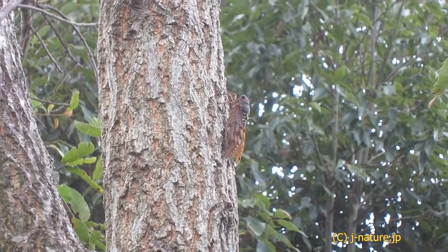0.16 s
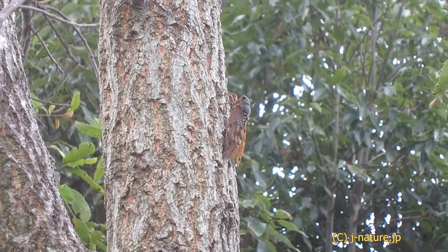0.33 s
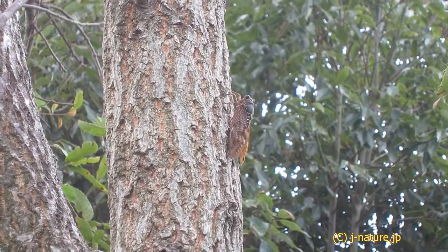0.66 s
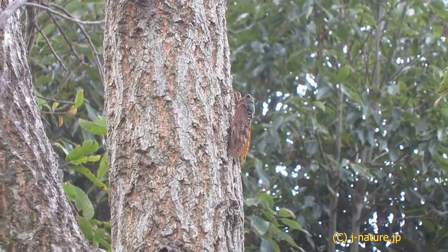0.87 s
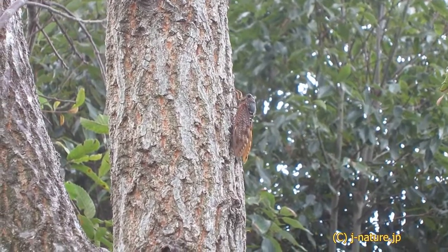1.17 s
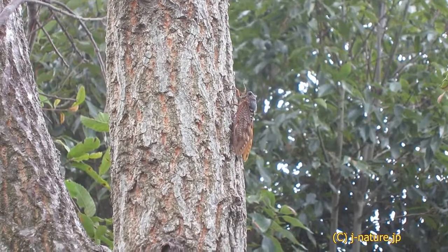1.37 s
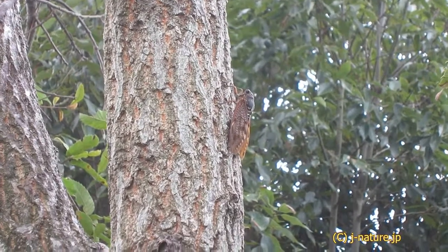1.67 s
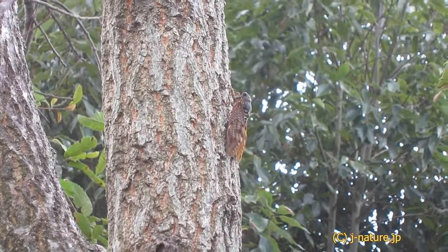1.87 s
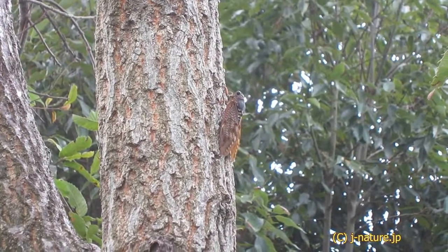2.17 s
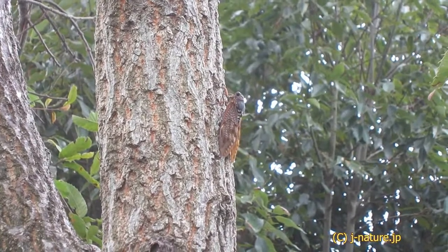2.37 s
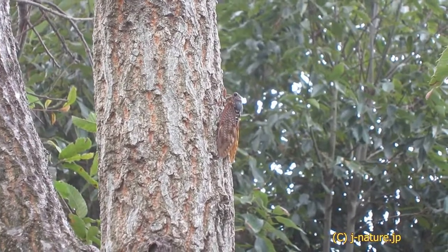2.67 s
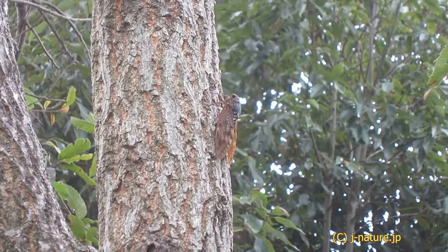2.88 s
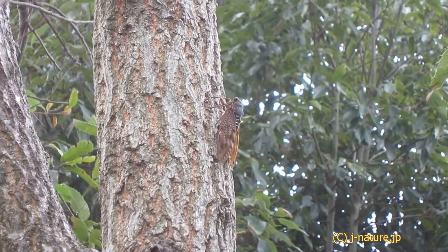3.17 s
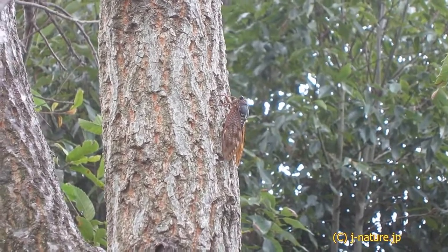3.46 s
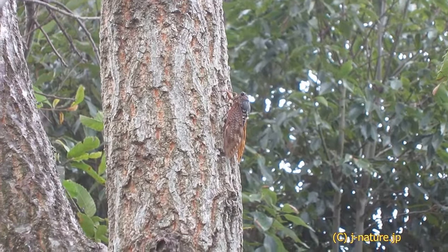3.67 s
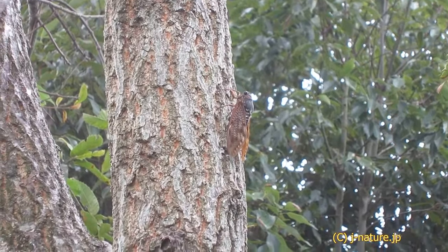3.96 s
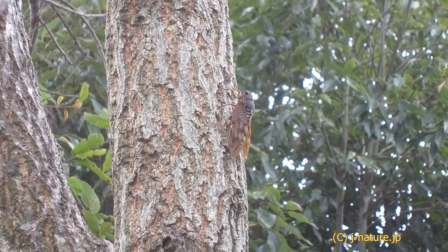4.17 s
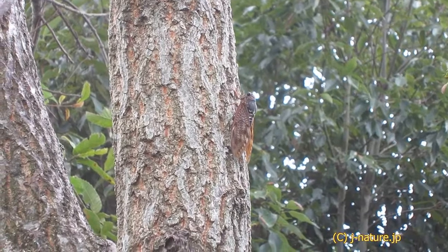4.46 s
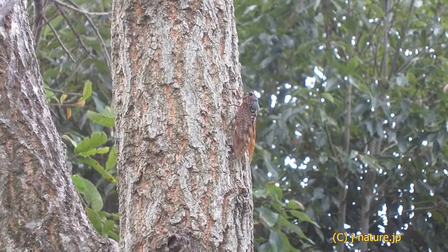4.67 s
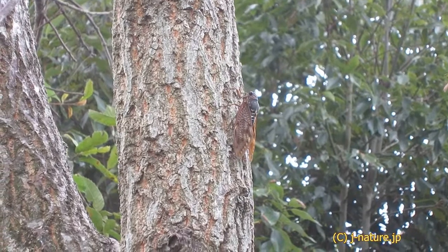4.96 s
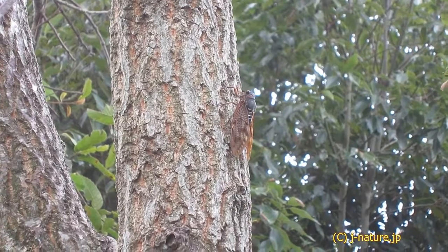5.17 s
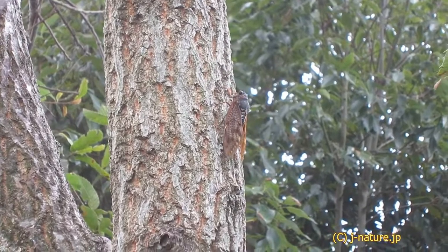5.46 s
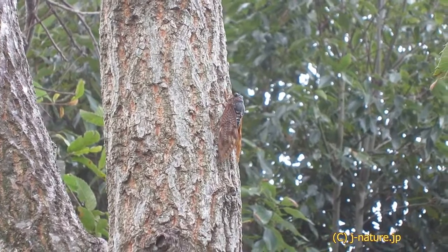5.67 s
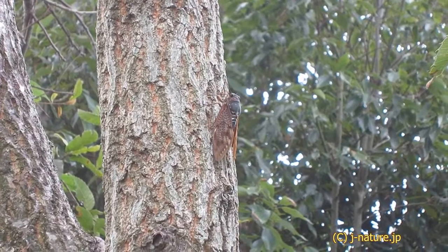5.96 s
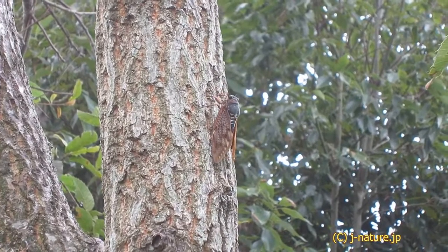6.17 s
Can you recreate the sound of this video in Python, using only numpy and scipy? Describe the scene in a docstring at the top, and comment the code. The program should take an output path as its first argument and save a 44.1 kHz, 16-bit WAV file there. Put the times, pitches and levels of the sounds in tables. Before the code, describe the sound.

A cicada close by repeats short, high rasps between dry ticks, with faint distant cicadas and birds behind it.

```python
"""A cicada on a tree trunk

Close by, a cicada makes loose dry ticks and, every 0.6 s, a short rasp that speeds up, swells, rises
and stops. Each click is a ribbed tymbal buckling, ringing the air sac of the abdomen and snapping
back; a harder pull is louder and higher. The trees answer briefly. Far off, other cicadas whine and
birds chirp and coo over a faint outdoor rumble."""
import sys
import numpy as np
from scipy import signal
from scipy.fft import rfft, irfft, next_fast_len
from scipy.io import wavfile
from scipy.ndimage import map_coordinates

SR = 44100
rng = np.random.default_rng(int(sys.argv[2]) if len(sys.argv) > 2 else 0)


def log_audio(samples):
    """Write samples as a 16-bit WAV file to the path given in sys.argv[1]."""
    # one column per channel
    frames = np.atleast_2d(samples).T
    # limit to full scale, then quantise
    limited = np.clip(frames, -1, 1)
    pcm = np.round(limited * 32767).astype(np.int16)
    wavfile.write(sys.argv[1], SR, pcm)


N = 278712
T = np.arange(N) / SR

# What muscular effort does. Each row: effort from 0 to 1, strokes per second, lag between the tymbals
# in seconds, tymbal pitch in Hz, air sac pitch in Hz, time constant in seconds, snap-back level in dB.
EFFORT = [(0, 102, .0044, 4410, 4670, 0.00055, -5.5), (.2, 130, 0.0028, 4620, 4860, 0.00049, -4.5),
          (.5, 156, .0028, 4650, 5140, 0.0012, -10.5), (1, 177, 0.0029, 5030, 5983, 0.0011, -15)]


def cicada(tick_gain_db=3.51, pitch_spread=0.011, tymbal_db=-11,
           scrape_db=-28, effort_scrape_db=11, scrape_tau_s=0.0026, repeating_share=0.22,
           snap_delay_s=.0026, snap_jitter_s=.00022, snap_gain_db=-2.0,
           snap_scrape_db=-13, snap_tau_s=0.0011):
    """Driven resonance: a buckling tymbal rings the air sac, tuned above it, so that the two beat."""
    # Modes of buckling and snapping back. Each row: frequency in Hz, time constant in seconds, dB.
    buckle_modes = [(2080, 0.00025, -30.5), (3750, 0.00049, -76.5), (7350, .0002, -36)]
    snap_modes = [(4640, 0.0024, -8), (7800, 0.00024, -14), (9890, 0.00038, -2.5), (10000, 0.0011, -8),
                  (14600, .00025, -4.5), (15500, 0.00038, -1)]
    # Scrape of the ribs. Each row: frequency in Hz, relative spectral density in dB.
    rib_spectrum = [(1000, -37), (2200, -12), (3000, -36), (5000, 4), (7000, 3.5), (8500, 3.5), (10300, 8),
                    (12000, 0), (14000, 12), (16000, 6)]
    # The small body radiates hardly any bass. Each row: frequency in Hz, gain in dB.
    radiation = [(300, -27), (1000, -14), (1550, -11.5), (2200, 1.5), (3000, -8.5), (3600, -5),
                 (4800, -0.5), (5300, -3), (5850, 4), (6500, 4.5), (9000, 0), (16000, -4.5)]
    click_samples = 400
    start, db, snap_db, effort, tuning = np.array(tick_strokes() + rasp_strokes()).T[:, :, None]
    _, _, tymbal_hz, sac_hz, tau, _ = read(EFFORT, effort)
    index = np.ceil(start * SR).astype(int) + np.arange(click_samples)
    t = index / SR - start
    tymbal_detune, sac_draw, snap_shift, snap_scatter_db = rng.standard_normal((4, len(start), 1))
    sac_detune = (tymbal_detune + sac_draw) / np.sqrt(2)
    tymbal_pole = 2j * np.pi * tymbal_hz * tuning * (1 + pitch_spread * tymbal_detune) - 1 / tau
    sac_pole = 2j * np.pi * sac_hz * tuning * (1 + pitch_spread * sac_detune) - 1 / tau
    # The driven sac swells and fades; the tymbal's own sound gives the click its sharp front.
    tymbal = np.exp(tymbal_pole * t)
    sac = (tymbal - np.exp(sac_pole * t)) / (tymbal_pole - sac_pole + 1e-6)
    tone = sac / np.abs(sac).max(axis=1, keepdims=True) + amp(tymbal_db) * tymbal
    tone = tone.imag / np.abs(tone).max(axis=1, keepdims=True)
    # The same ribs scrape in every stroke, so part of their pattern repeats.
    ribs = np.sqrt(repeating_share) * noise(rib_spectrum, click_samples)
    ribs = ribs + np.sqrt(1 - repeating_share) * noise(rib_spectrum, t.shape)
    scrape = amp(scrape_db + effort_scrape_db * effort) * np.exp(-t / scrape_tau_s) * ribs
    buckle = tone + ring(buckle_modes, t) + scrape
    # The released tymbal springs back with a brighter, thinner click.
    since_snap = np.maximum(t - snap_delay_s - snap_jitter_s * snap_shift, 0)
    scrape_envelope = amp(snap_scrape_db) * (since_snap > 0) * np.exp(-since_snap / snap_tau_s)
    snap = ring(snap_modes, since_snap) + scrape_envelope * noise(rib_spectrum, t.shape)
    snap *= amp(snap_db + snap_gain_db + snap_scatter_db)
    clicks = amp(db + tick_gain_db * (effort == 0)) * (buckle + snap)
    song = np.bincount(index.ravel(), clicks.ravel(), N)[:N]
    return filtered(song, lambda hz: amp(along(radiation, hz)))


def tick_strokes(usual_db=-25, usual_tuning=.982, octaves_per_db=.006,
                 spring_db=-27.8, fade_db_per_s=.5, second_db=1.2, second_snap_db=3.2):
    """Isolated impulses: one tymbal buckles, or both in quick succession."""
    # Ticks. Each row: start in seconds, relative level in dB, second tymbal's lag in seconds (0: none).
    ticks = [(.007, -23, 0), (.04, -25.5, 0), (.0919, -26.5, .007), (.1375, -30, .005),
             (.1832, -27.5, .007), (.2291, -28.5, .006), (.2703, -26.5, .009), (.4625, -26.5, 0),
             (.5344, -26.5, 0), (.5818, -24, 0), (.603, -25, 0), (.6561, -24, 0), (.7292, -23, 0),
             (.7825, -23, 0), (.8059, -28.5, 0), (.8708, -27.5, 0), (.8869, -28, 0), (.8974, -24.5, 0),
             (1.071, -26, .007), (1.129, -27, 0), (1.1612, -24.5, 0), (1.209, -24, .005),
             (1.2607, -25, .006), (1.3592, -25.5, 0), (1.3881, -25, 0), (1.4371, -24, 0), (1.467, -25.5, 0),
             (1.4903, -28, .004), (1.6817, -26, .007), (1.7623, -24.5, 0), (1.7988, -24, .005),
             (1.8796, -26.5, .006), (1.9252, -27.5, 0), (1.9901, -22.5, 0), (2.0056, -27, .006),
             (2.0408, -26, 0), (2.0735, -23.5, .002), (2.0997, -26, 0), (2.282, -27, .004),
             (2.3233, -26.5, 0), (2.3488, -21.5, .005), (2.3797, -28, 0), (2.423, -25.5, 0),
             (2.4578, -25, .005), (2.4926, -27.5, .007), (2.5368, -26.5, .007), (2.5794, -25, 0),
             (2.6658, -24.5, .0035), (2.676, -25.5, 0), (2.841, -26.5, .005), (2.9039, -25.5, 0),
             (2.9334, -25, .007), (2.96, -22.5, .007), (2.9965, -29, 0), (3.0455, -23, 0), (3.0875, -26, 0),
             (3.124, -25.5, 0), (3.1521, -22.5, 0), (3.1774, -29, 0), (3.2601, -25, .0065),
             (3.4525, -26, 0), (3.4804, -22.5, 0), (3.536, -19.5, 0), (3.5881, -21, 0), (3.6233, -27.5, 0),
             (3.6422, -24, 0), (3.7427, -26.5, 0), (3.7841, -27, 0), (3.8151, -26, 0), (3.8383, -25, 0),
             (4.0257, -26.5, .005), (4.0818, -22.5, 0), (4.1365, -22.5, 0), (4.1587, -23.5, .006),
             (4.182, -25.5, 0), (4.2147, -26.5, 0), (4.2692, -25.5, 0), (4.318, -28, 0), (4.3581, -25.5, 0),
             (4.4286, -23.5, 0), (4.454, -23, .005), (4.627, -25.5, .0045), (4.6758, -23.5, 0),
             (4.7006, -24, 0), (4.7992, -25, 0), (4.8892, -24.5, 0), (4.9353, -25.5, .007),
             (4.9814, -25.5, 0), (5.0268, -24.5, .007), (5.0575, -22.5, 0), (5.2406, -23, 0),
             (5.2685, -24.5, .006), (5.2934, -22.5, 0), (5.3081, -21.5, 0), (5.3339, -23, 0),
             (5.363, -23.5, 0), (5.4167, -21.5, 0), (5.436, -28, 0), (5.4653, -22.5, 0), (5.5034, -27.5, 0),
             (5.531, -24.5, 0), (5.5763, -21, 0), (5.6297, -23, 0), (5.654, -27.5, 0), (5.8293, -24, .0055),
             (5.8702, -23, 0), (5.9996, -21.5, 0), (6.0267, -22.5, 0), (6.058, -21.5, 0),
             (6.0913, -20.5, 0), (6.1225, -25.5, 0), (6.1982, -22, 0), (6.231, -25, 0), (6.2511, -21, 0)]
    strokes = []
    for start, db, lag in ticks:
        # The snap-back is the tymbal's own spring: independent of the pull, slowly weakening.
        snap_db = spring_db - fade_db_per_s * start
        clicks = [(start, db, snap_db)]
        if lag > 0:
            clicks.append((start + lag, db + second_db, snap_db + second_snap_db))
        for at, level, snap_level in clicks:
            tuning = usual_tuning * 2 ** (octaves_per_db * (level - usual_db))
            strokes.append((at, level, snap_level - level, 0, tuning))  # zero effort
    return strokes


def rasp_strokes(usual_db=-6.3, usual_tuning=.978, octaves_per_db=.035,
                 scatter_db=.4, jitter_s=.00009, leading_db=1.4):
    """An accelerating pulse train: the two tymbals take turns, faster as the effort grows."""
    # Rasps. Each row: start in seconds, end in seconds, relative level in dB.
    rasps = [(.298, .3726, -6.3), (.906, .979, -6), (1.513, 1.595, -5.5), (2.107, 2.1939, -6.1),
             (2.686, 2.7615, -6.5), (3.276, 3.3471, -6.1), (3.857, 3.9398, -6.5), (4.476, 4.5461, -6.1),
             (5.061, 5.1434, -6.8), (5.661, 5.7481, -6.5), (6.268, 6.342, -7)]
    # Course of a rasp. Each row: seconds before its end, effort from 0 to 1, gain in dB.
    course = [(0, .95, -3.5), (.006, 0.91, -2), (.016, .95, -3.85), (.026, 0.73, -4.5), (.038, 0.48, -7),
              (.052, .17, -13.5), (.068, 0.11, -14.5), (.09, 0, -14.5)]
    strokes = []
    for start, end, rasp_db in rasps:
        tuning = usual_tuning * 2 ** (octaves_per_db * (rasp_db - usual_db))
        before_end = T[:int((end - start) * SR)]
        effort, course_db = read(course, before_end)
        rate, lag, _, _, _, snap_db = read(EFFORT, effort)
        whole_cycles = np.floor(np.cumsum(rate) / SR)
        for i in np.flatnonzero(np.diff(whole_cycles, prepend=-1)):
            for early, side_db in ((0, leading_db), (lag[i], 0)):
                at = end - before_end[i] - early + jitter_s * rng.normal()
                level = rasp_db + course_db[i] + side_db + scatter_db * rng.normal()
                if start < at < N / SR:
                    strokes.append((at, level, snap_db[i], effort[i], tuning))
    return strokes


def ring(modes, t, pitch_spread=0.029):
    """Free vibration: a sum of damped modes, a little different in pitch and strength for each click."""
    out = 0
    for hz, tau, db in modes:
        detune, strength = rng.standard_normal((2, len(t), 1))
        envelope = amp(db + 2 * strength) * np.exp(-t / tau)
        out = out + envelope * np.sin(2 * np.pi * hz * (1 + pitch_spread * detune) * t)
    return out


def direct_path(song):
    """Stereo localisation: the song reaches the two microphone ports with unequal level and phase."""
    # Level difference. Each row: frequency in Hz, left minus right in dB.
    pan = [(3700, 0), (4300, -4.5), (4600, 1.8), (5300, 3), (5800, -2), (6200, 1), (8000, .6), (10000, 2.6),
           (15000, 1)]
    # Phase difference. Each row: frequency in Hz, lead of the left port in radians.
    lead = [(3900, 0), (4400, .8), (5000, .2), (5550, -.6), (6100, .3), (7200, -.1), (10000, -.3),
            (15000, -.45)]
    sides = np.array([[.5], [-.5]])
    return filtered(song, lambda hz: amp(sides * along(pan, hz)) * np.exp(1j * sides * along(lead, hz)))


def trees(x, near_db=-7.5, near_t60_s=0.047, far_db=-14.0, far_t60_s=0.2, sections=21):
    """Scattering: bark and nearby leaves answer at once, the grove behind a little longer."""
    t = T[:SR // 4]
    out = np.zeros((2, N + SR))
    decays = [amp(db) * unit(amp(-60 * t / t60) * (t > .0005)) / np.sqrt(len(t))
              for db, t60 in ((near_db, near_t60_s), (far_db, far_t60_s))]
    for part in np.array_split(np.arange(N), sections):
        impulse_response = np.hypot(*decays) * rng.standard_normal((2, len(t)))
        echo = signal.fftconvolve(x[part][None], impulse_response, axes=1)
        out[:, part[0]:part[0] + echo.shape[1]] += echo
    return out[:, :N]


def far_cicadas(chorus_db=-54, waver_db=1.03, throb_db=4.5, throbs_per_s=17.4):
    """Incoherent summation: far singers merge into a chorus and a whine; single calls throb over it."""
    # The chorus. Each row: frequency in Hz, relative spectral density in dB.
    chorus = [(2600, -25), (3300, 0), (4200, 1), (4800, -7.5), (6200, 0.5), (7300, 4), (8200, -6),
              (9000, -6.5), (10500, -7.5), (12000, -18), (14000, -4.5), (16000, -53)]
    # The steady whine. Each row: frequency in Hz, width in Hz, rms level in dB.
    whine = [(7070, 36, -49), (6990, 210, -48), (6820, 190, -57), (3350, 120, -70)]
    # Swelling calls. Each row: start and end in seconds, levels of the upper and lower band in dB.
    calls = [(.05, .61, -55, -63), (.9, 1.33, -59, -57), (3.38, 3.79, -57, -62), (4.1, 4.45, -64, -72),
             (5.17, 5.58, -51, -70), (6, 6.4, -58, -70)]
    # The two bands of a call. Each row: first frequency, last frequency and width, all in Hz.
    bands = [(7600, 8350, 600), (4150, 4050, 300)]
    out = amp(chorus_db + waver_db * wobble(3.47)) * noise(chorus, (2, N))
    for hz, width_hz, db in whine:
        out += amp(db + waver_db * wobble(3)) * narrowband(np.full(N, hz), width_hz)
    for start, end, *levels in calls:
        on = (T > start) & (T < end)
        t = T[on] - start
        progress = t / (end - start)
        throb = amp(throb_db * np.sin(2 * np.pi * throbs_per_s * t))
        envelope = np.sqrt(np.sin(np.pi * progress)) * throb
        for db, (first_hz, last_hz, width_hz) in zip(levels, bands):
            glide_hz = first_hz + (last_hz - first_hz) * progress
            out[:, on] += amp(db) * envelope * narrowband(glide_hz, width_hz)
    return out


def far_birds(chirp_every_s=.075, chirp_s=.038, chirp_glide_hz=(3570, 3220),
              coo_first_s=-.03, coo_every_s=2.07, echo_db=5.5):
    """Reverberant field: far chirps and a slow, regular coo arrive mostly scattered by the trees."""
    # Runs of falling chirps. Each row: first and last onset in seconds, direct level in dB.
    chirp_runs = [(1.015, 1.237, -54.5), (4.815, 4.965, -52), (5.15, 5.15, -54)]
    # Notes of the coo. Each row: delay and length in seconds, pitch in Hz, direct level in dB.
    coo = [(0, .31, 428, -61.5), (.46, .33, 400, -64)]
    notes = np.zeros(N)
    for first, last, db in chirp_runs:
        for start in np.arange(first, last + chirp_every_s / 2, chirp_every_s):
            notes += amp(db) * whistle(start, chirp_s, *chirp_glide_hz, waver=.015)
    for phrase in np.arange(coo_first_s, N / SR - coo_every_s / 2, coo_every_s):
        for delay, length, hz, db in coo:
            notes += amp(db) * whistle(phrase + delay, length, hz, hz, waver=.009)
    return notes + amp(echo_db) * trees(notes, sections=1)


def whistle(start, length, first_hz, last_hz, waver):
    """Frequency modulation: a pure tone glides and wavers as it swells and fades."""
    progress = np.clip((T - start) / length, 0, 1)
    hz = (first_hz + (last_hz - first_hz) * progress) * (1 + waver * wobble(25))
    return np.sin(np.pi * progress) * np.sin(2 * np.pi * np.cumsum(hz) / SR)


def outdoors(mid_db=-55.0, side_db=-54, waver_db=0.1,
             bump_s=0.397, bump_width_s=0.031, bump_hz=112, bump_db=-51):
    """Ambient noise: a faint rumble, nearly uncorrelated at the ports, with drones and one soft bump."""
    # The rumble. Each row: frequency in Hz, relative spectral density in dB.
    rumble = [(20, -11), (42, -7), (58, -5), (75, -2.5), (118, -1), (170, -3), (420, -6.5), (700, -11),
              (1000, -13.5), (1600, -19), (2800, -28.5), (6000, -59)]
    # Steady drones. Each row: frequency in Hz, width in Hz, rms level in dB.
    drones = [(57.8, 10, -66), (118, 24, -66.5), (989, 40, -74.5)]
    mid, side = noise(rumble, (2, N)) * amp([[mid_db], [side_db]]) * amp(waver_db * wobble(3.6))
    for hz, width_hz, db in drones:
        mid += amp(db) * narrowband(np.full(N, hz), width_hz)[0]
    bump_envelope = amp(bump_db) * np.exp(-((T - bump_s) / bump_width_s) ** 2)
    mid += bump_envelope * np.sin(2 * np.pi * bump_hz * T)
    return np.array([mid + side, mid - side])


def amp(db):
    """Amplitude ratio of a level in decibels."""
    return 10 ** (np.asarray(db) / 20)


def unit(x):
    """Normalisation to rms 1."""
    return x / np.sqrt(np.mean(np.abs(x) ** 2) + 1e-20)


def along(points, hz):
    """Interpolation of (Hz, value) points on a logarithmic frequency axis."""
    point_hz, values = np.transpose(points)
    return np.interp(np.log(hz + 1), np.log(point_hz + 1), values)


def read(rows, at):
    """Linear interpolation of every further column at the given values of the first."""
    key, *columns = np.transpose(rows)
    return [np.interp(at, key, column) for column in columns]


def filtered(x, response):
    """Linear filtering: the spectrum of x times a frequency response."""
    n = x.shape[-1]
    padded = next_fast_len(n + min(n, SR // 2))
    spectrum = rfft(x, padded) * response(np.fft.rfftfreq(padded, 1 / SR))
    return irfft(spectrum, padded)[..., :n]


def noise(spectrum, shape):
    """Spectral shaping: coloured noise of rms 1."""
    return unit(filtered(rng.standard_normal(shape), lambda hz: amp(along(spectrum, hz))))


def wobble(knots_per_s):
    """Slow fluctuation: a smooth curve through random knots."""
    knots = rng.standard_normal(int(N * knots_per_s / SR) + 4)
    return map_coordinates(knots, [T * knots_per_s])


def narrowband(hz, width_hz):
    """Random quadrature modulation: a stereo noise band of rms 1 along a pitch curve."""
    knots = rng.standard_normal((2, 2, int(len(hz) * width_hz * 2 / SR) + 4))
    at = np.arange(len(hz)) * width_hz * 1.3 / SR
    phase = 2 * np.pi * np.cumsum(hz) / SR
    channels = [map_coordinates(a, [at]) * np.cos(phase) + map_coordinates(b, [at]) * np.sin(phase)
                for a, b in knots]
    return unit(np.array(channels))


def scene():
    """Superposition of the near singer, its echo in the trees and the background."""
    song = cicada()
    return direct_path(song) + trees(song) + far_cicadas() + far_birds() + outdoors()


def record(dry):
    """Band limiting: a steep low-pass removes the highest treble."""
    cutoff_hz, transition_hz = 15850, 200
    return filtered(dry, lambda hz: np.clip((cutoff_hz - hz) / transition_hz + .5, 0, 1))


dry = scene()
out = record(dry)
log_audio(out)
```